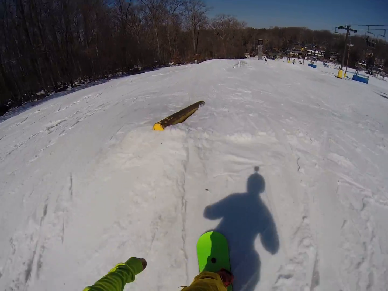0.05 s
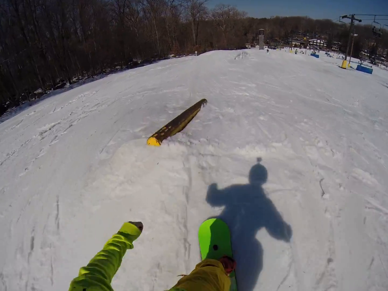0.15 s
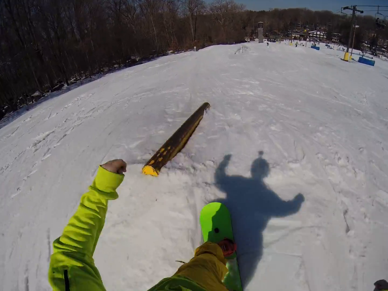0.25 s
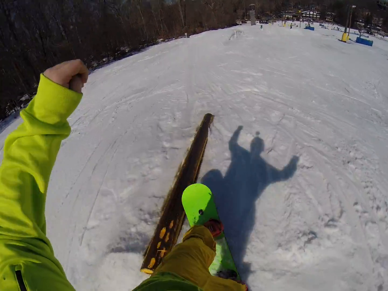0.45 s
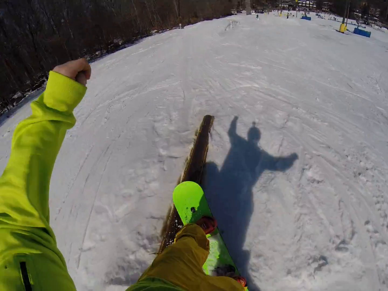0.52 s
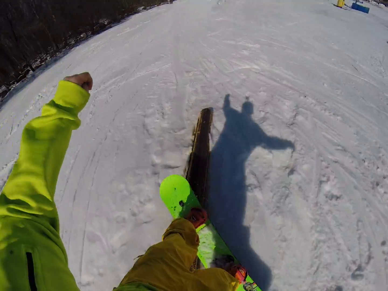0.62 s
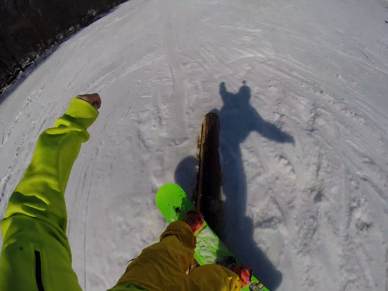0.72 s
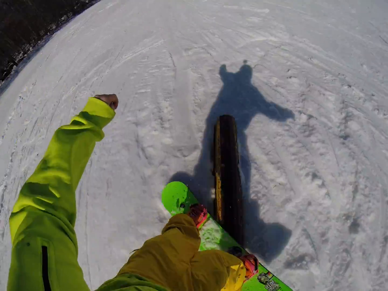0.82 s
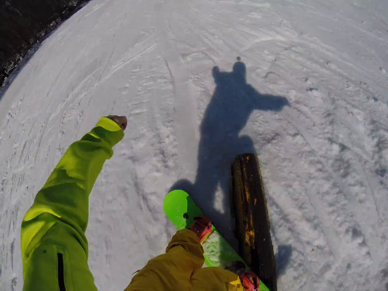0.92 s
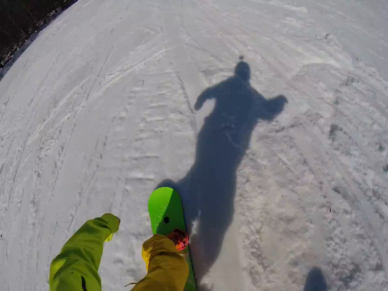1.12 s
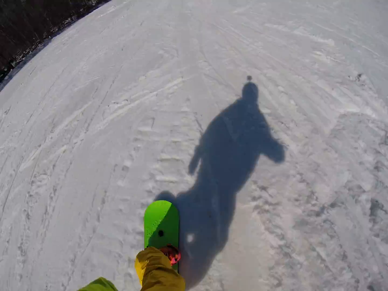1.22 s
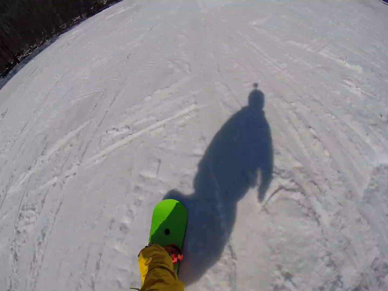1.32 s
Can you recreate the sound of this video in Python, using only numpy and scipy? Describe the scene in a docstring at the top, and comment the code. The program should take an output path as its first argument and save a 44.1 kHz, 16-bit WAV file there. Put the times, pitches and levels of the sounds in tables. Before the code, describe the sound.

Close snowboard hissing across packed snow, knocking along a log, with low thumps and wind.

```python
"""A snowboard run on packed snow, heard close up from the microphone of a camera worn by the rider.
The base rasps and the grains hiss from the start, while wind rumbles on the case and every jolt
thumps through the mount. The board hops onto a log, judders along it from about 0.45 s and clacks
on the wood from 0.8 s. Near 1 s it lands in a spray of snow; then its edge scrapes into the crust
and it glides on."""
import sys
import numpy as np
from scipy import signal
from scipy.fft import rfft, irfft
from scipy.io import wavfile
from scipy.ndimage import uniform_filter1d

SR = 44100
rng = np.random.default_rng(int(sys.argv[2]) if len(sys.argv) > 2 else 0)


def log_audio(samples):
    """Write samples as a 16-bit WAV file to the path given in sys.argv[1]."""
    # one column per channel
    frames = np.atleast_2d(samples).T
    # limit to full scale, then quantise
    limited = np.clip(frames, -1, 1)
    pcm = np.round(limited * 32767).astype(np.int16)
    wavfile.write(sys.argv[1], SR, pcm)


N = 59535


def undb(db):
    """Decibels to gain."""
    return 10 ** (np.asarray(db) / 20)


def unit(x):
    """Scale to rms 1."""
    return x / np.sqrt(np.mean(x ** 2))


def curve(rows):
    """Gain over time from (s, dB) points."""
    return undb(np.interp(np.arange(N) / SR, *np.array(rows).T))


def decay(age, t60):
    """A ring dying away by 60 dB in t60 seconds."""
    return np.exp(-np.log(1000) * age / t60)


def colour(x, points):
    """Shape a sound by (Hz, dB) points, falling away beyond both ends; rms 1."""
    hz, db = np.array(points).T
    f = np.maximum(np.arange(N // 2 + 1) * SR / N, 1)
    gain = undb(np.interp(np.log(f), np.log(hz), db))
    ends = np.minimum(np.minimum(f / hz[0], hz[-1] / f), 1) ** 2
    return unit(irfft(rfft(x) * gain * ends, N))


def waver(rate_hz):
    """Smooth random wavering; rms 1."""
    width = max(int(SR / rate_hz), 2)
    return unit(uniform_filter1d(uniform_filter1d(rng.standard_normal(N), width), width))


def crunch(grain_db, spread_db, grains_per_s=2500):
    """Snow crystals breaking: tiny clicks of uneven size over a smooth rush."""
    clicks = (rng.random(N) < grains_per_s / SR) * rng.choice([-1, 1], N)
    sizes = undb(spread_db * np.minimum(rng.exponential(size=N), 2 * np.pi))
    return rng.standard_normal(N) + undb(grain_db) * unit(clicks * sizes)


def rumble(points):
    """Low shaking of a given colour, its strength evened out over a few cycles."""
    noise = colour(rng.standard_normal(N), points)
    return noise / np.sqrt(uniform_filter1d(noise ** 2, size=2600))


# Gusts right at the microphone. Each row: time in seconds, level in dB.
WIND_LEVELS = [(0, -26), (0.041, -27), (.08, -34), (.14, -25), (.19, -30), (.39, -34), (0.498, -26),
               (.62, -20), (.7, -22), (.8, -33.5), (.9, -28), (1.05, -27), (1.2, -28.5), (1.28, -30)]
# Their deep tone. Each row: frequency in Hz, relative level in dB.
WIND_SPECTRUM = [(12, -4), (24, 7), (42, -1.5), (65, -7), (90, -20.5), (130, -18), (180, -24), (260, -35.5),
                 (600, -81)]


def wind():
    """Wind buffets the camera case."""
    return rumble(WIND_SPECTRUM) * curve(WIND_LEVELS)


# Snow underfoot: the rasp of the running base, the grains beneath it and the powder thrown up.
# Each row: time in seconds, relative level in dB.
BASE_LEVELS = [
    [(0.0, -41), (0.262, -44.5), (0.316, -48.5), (0.344, -46), (0.66, -45), (0.7, -50), (0.708, -44),
     (0.795, -47.5)],
    [(0.825, -48), (0.917, -46), (1.017, -47), (1.109, -52), (1.127, -45), (1.265, -50), (1.325, -46),
     (1.35, -49)],
]
HISS_LEVELS = [(0, -50), (.15, -52), (.2, -55), (.27, -52), (.32, -47), (.41, -47), (.45, -52), (.6, -51.5),
               (.7, -58), (.79, -63), (.83, -57), (.88, -61), (.93, -51.5), (.98, -45.5), (1.1, -45),
               (1.22, -46), (1.26, -48), (1.35, -50)]
POWDER_LEVELS = [(0, -64), (.2, -65), (.35, -57), (.41, -58), (.46, -64), (.6, -66), (.7, -69.5),
                 (.79, -71), (.83, -67), (.88, -68), (.95, -62), (.98, -58), (1.07, -63), (1.13, -54.5),
                 (1.35, -59)]
# The same three layers, dull to bright. Each row: frequency in Hz, relative level in dB.
BASE_SPECTRUM = [(150, -21), (250, -3), (450, -7.5), (800, -11), (1150, -9), (1500, 0), (1750, -0.5),
                 (2200, -2.5), (2800, -3.5), (3150, -16.5), (4000, -20.5), (7000, -54)]
HISS_SPECTRUM = [(2500, 0), (3200, -5.5), (3450, -1.5), (3850, -8.5), (4400, 3), (5200, 1.5), (6200, -1),
                 (7100, -11.5), (8000, -14), (11000, -39.5)]
POWDER_SPECTRUM = [(6000, -2), (7500, -7.5), (8400, 5.5), (9000, -1), (9900, 1), (10700, -9.5), (11700, -2),
                   (12300, -13), (14000, -13), (15500, -19)]


def sliding():
    """The base rasps over the snow, grains hiss and powder sprays; all flutter with the bumps."""
    bumps = undb(0.42 * waver(rate_hz=34))
    base = colour(crunch(grain_db=-6, spread_db=2.0), BASE_SPECTRUM) * curve(np.vstack(BASE_LEVELS))
    hiss = colour(crunch(grain_db=-6.5, spread_db=3.0), HISS_SPECTRUM) * curve(HISS_LEVELS)
    powder = colour(crunch(grain_db=-1, spread_db=2.5), POWDER_SPECTRUM) * curve(POWDER_LEVELS)
    return (undb(3.5) * base + undb(1.5) * hiss + undb(0.5) * powder) * bumps


# Shaking on the log, as it reaches the camera. Each row: time in seconds, level in dB.
JUDDER_LEVELS = [(.44, -80), (0.466, -26), (.5, -32.5), (.56, -43), (0.586, -33), (.61, -48), (0.646, -30),
                 (.7, -39), (.74, -44), (.8, -80)]
# Its low drone. Each row: frequency in Hz, relative level in dB.
JUDDER_SPECTRUM = [(50, -9), (85, -3), (110, -5), (130, 5.5), (150, -8), (180, -24), (300, -33), (450, -32),
                   (900, -50)]


def judder():
    """The board judders along the log in uneven surges."""
    return rumble(JUDDER_SPECTRUM) * curve(JUDDER_LEVELS)


# Thumps carried to the microphone through the mount. Each row: start in seconds, strength in dB,
# ring in Hz, time to fall 60 dB in seconds, contact time in seconds, direction as +1 or -1.
MOUNT_JOLTS = [(0.2362, 1, 48.1, 0.25, 0.01, -1), (0.4528, 0.5, 46.8, 0.1, 0.0091, 1),
               (0.529, -11, 78, 0.031, 0.0085, 1), (0.58, -21, 75.6, 0.054, 0.011, 1),
               (.652, -6, 77, 0.045, 0.0089, 1), (0.9159, -4.5, 57.4, 0.14, 0.0083, -1),
               (0.9329, -0.5, 51.3, 0.21, 0.0069, -1), (1.012, 3, 43.5, 0.11, 0.0085, 1),
               (1.119, -4, 49.1, 0.26, 0.0092, -1)]


def jolts(t, rattle_hz=161.2, mic_low_cut_hz=13):
    """Each soft push sets the camera swinging on its mount and rattles a second, stiffer mode."""
    out = np.zeros(N)
    rattle = undb(-17) * np.sin(2 * np.pi * rattle_hz * t) * decay(t, t60=0.15)
    for start, db, hz, t60, contact, direction in MOUNT_JOLTS:
        push = np.cos(np.pi * np.clip((t - start) / contact, -0.5, 0.5)) ** 2
        swing = np.cos(2 * np.pi * hz * t) * decay(t, t60)
        out += direction * undb(db) * signal.fftconvolve(push / push.sum(), swing + rattle)[:N]
    low_cut = signal.butter(1, mic_low_cut_hz, "high", fs=SR, output="sos")
    return signal.sosfilt(low_cut, out)


# Snow flying up around the rider. Each row: frequency in Hz, relative level in dB.
SPRAY_SPECTRUM = [(3000, -10), (5000, 7), (7000, 2), (8500, 3), (10000, 7), (10800, -7), (11800, -4),
                  (13000, -16), (14200, -12), (15000, -6)]


def spray(t, start_s=0.96, rise_s=0.015, fall_s=0.077):
    """Touchdown throws up a bright fizz of snow."""
    age = np.maximum(t - start_s, 0)
    burst = np.minimum(age / rise_s, 1) * np.exp(-np.maximum(age - rise_s, 0) / fall_s)
    fizz = colour(crunch(grain_db=-4, spread_db=2.5), SPRAY_SPECTRUM)
    return undb(-48.5) * burst * fizz


# The crust grinding and snapping past the log. Each row: frequency in Hz, relative level in dB.
GRIT_SPECTRUM = [(200, 8), (600, -3.5), (900, -4), (1500, -9), (2100, -3), (2800, 3), (3200, -6.5),
                 (4800, -3), (5750, -2), (6600, -5), (8000, -16), (10000, -13), (14000, -38)]
SNAP_SPECTRUM = [(300, -8), (800, -10), (2000, 0.5), (4500, -3), (5800, 0), (7000, -5), (9000, -15),
                 (12000, -21), (15000, -22)]
# The edge's squeak. Each row: frequency in Hz, level in dB, time to fall 60 dB in seconds.
SQUEAK_TONES = [(5520, -33, .035), (5800, -26, .028)]


def scrape(t, peak_s=1.1325, rise_s=0.0078, fall_s=0.036, attack_s=0.0007, snap_decay_s=0.005):
    """The edge digs into the crust: a quick gritty swell with a snap and a squeak at its height."""
    age = np.maximum(t - peak_s, 0)
    swell = np.exp(-np.abs(t - peak_s) / np.where(t < peak_s, rise_s, fall_s))
    snap = undb(-34.5) * np.exp(-age / snap_decay_s) * colour(rng.standard_normal(N), SNAP_SPECTRUM)
    squeak = sum(undb(db) * np.sin(2 * np.pi * hz * age + waver(rate_hz=300) / 2) * decay(age, t60)
                 for hz, db, t60 in SQUEAK_TONES)
    grit = undb(-34) * swell * colour(crunch(grain_db=-5.5, spread_db=2.5), GRIT_SPECTRUM)
    attack = np.minimum(age / attack_s, 1)
    return grit + attack * (snap + squeak)


# Hits on the log, at the rider's feet below the microphone.
# Each row: start in seconds, relative ring level in dB, crack level in dB, pitch factor.
LOG_HITS = [(.8030, -21, -30, 0.98), (0.919, -25, -42, 0.775), (.9290, -32, -33.5, 1.0),
            (1.0071, -26, -32.5, 0.92)]
# The board's modes. Each row: frequency in Hz at pitch factor 1, relative level in dB,
# time to fall 60 dB in seconds.
BOARD_MODES = [(275, -9.5, .07), (429, -11, 0.086), (1150, -2, 0.022), (1430, 0, 0.025), (1637, -0.5, 0.02),
               (2670, -15, 0.026), (4500, -13, 0.012)]
# The crack of contact. Each row: frequency in Hz, relative level in dB.
CRACK_SPECTRUM = [(200, 12), (400, 12), (800, -4), (1500, 2.5), (2200, 1), (2900, 0), (3600, -9), (4500, 2),
                  (6000, -6.5), (8000, -15), (10000, -18), (11500, -39)]


def clacks(t, attack_s=0.0007, crack_decay_s=0.0027, tail_decay_s=0.052):
    """Board on wood: a short crack with a faint tail, and quickly damped modes."""
    out = np.zeros(N)
    for start, ring_db, crack_db, pitch in LOG_HITS:
        age = np.maximum(t - start, 0)
        attack = np.sin(np.pi / 2 * np.minimum(age / attack_s, 1)) ** 2
        ring = sum((-1) ** k * undb(db) * np.sin(2 * np.pi * hz * pitch * age) * decay(age, t60)
                   for k, (hz, db, t60) in enumerate(BOARD_MODES))
        fade = np.exp(-age / crack_decay_s) + undb(-12.5) * np.exp(-age / tail_decay_s)
        crack = fade * colour(rng.standard_normal(N), CRACK_SPECTRUM)
        out += attack * (undb(ring_db) * ring / 2 + undb(crack_db) * crack)
    return out


def scene():
    """Everything as it reaches the one microphone on the rider."""
    t = np.arange(N) / SR
    shaking = wind() + judder() + jolts(t)
    return (shaking + sliding() + clacks(t) + spray(t) + scrape(t))[None]


def record(dry):
    """The camera cuts the highest treble steeply."""
    top_hz = 15250
    return signal.sosfilt(signal.ellip(8, 0.2, 70, top_hz, fs=SR, output="sos"), dry)


dry = scene()
out = record(dry)
log_audio(out)
```